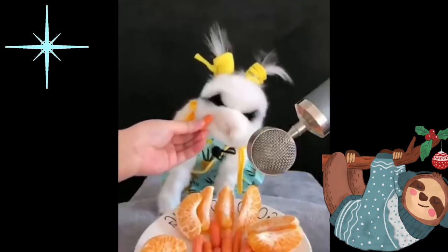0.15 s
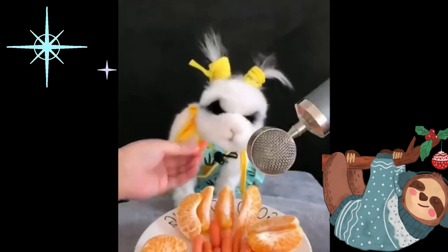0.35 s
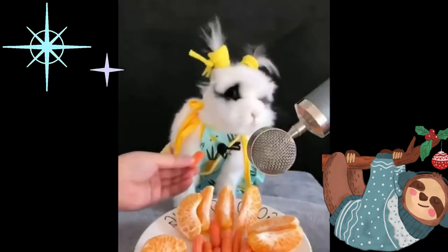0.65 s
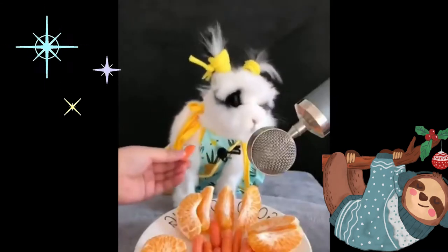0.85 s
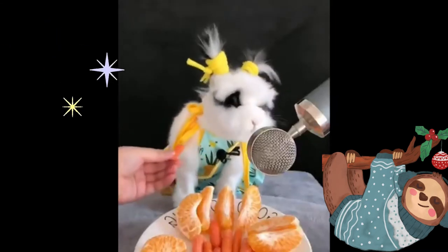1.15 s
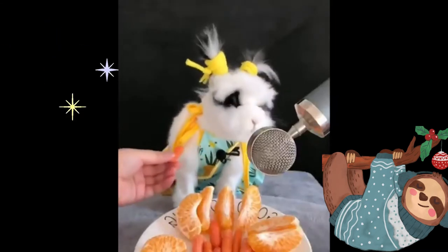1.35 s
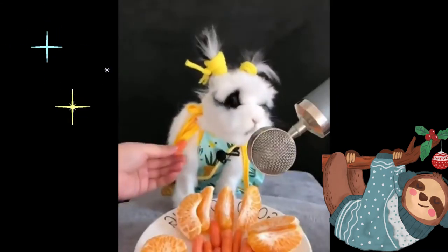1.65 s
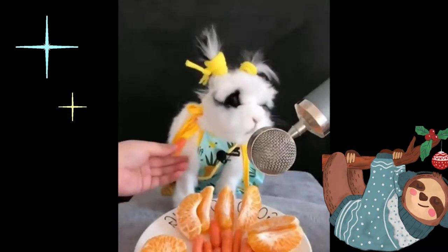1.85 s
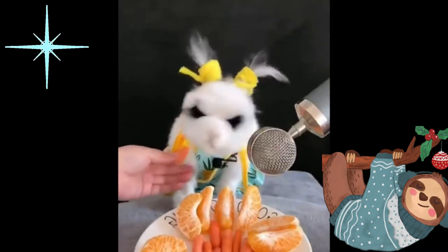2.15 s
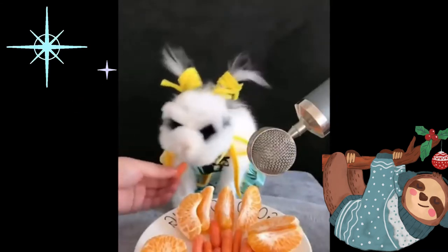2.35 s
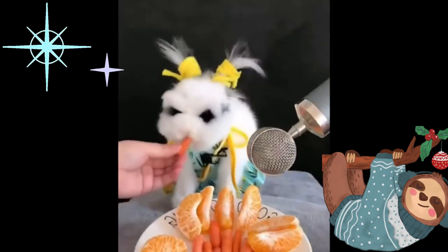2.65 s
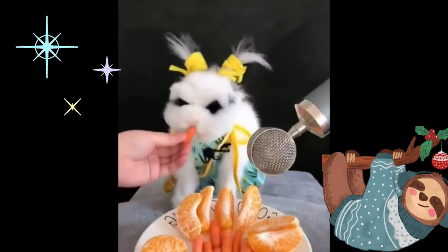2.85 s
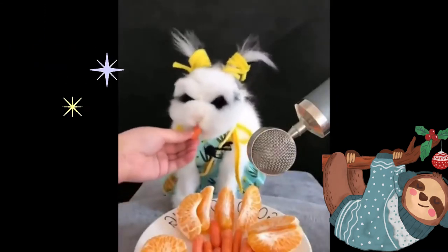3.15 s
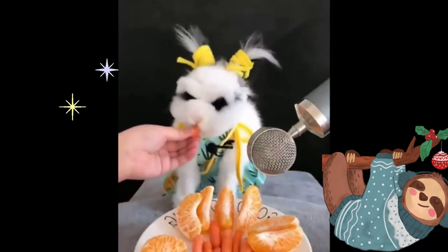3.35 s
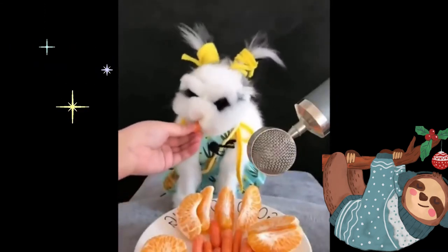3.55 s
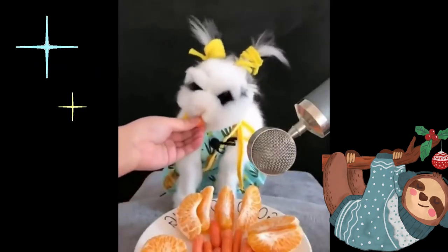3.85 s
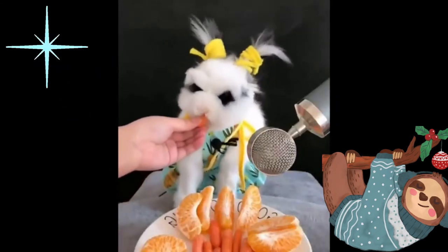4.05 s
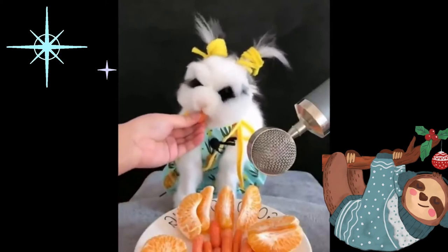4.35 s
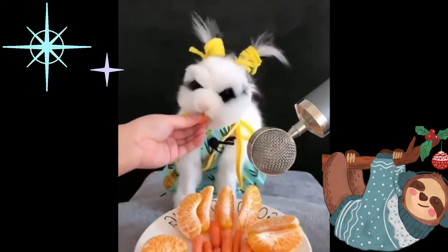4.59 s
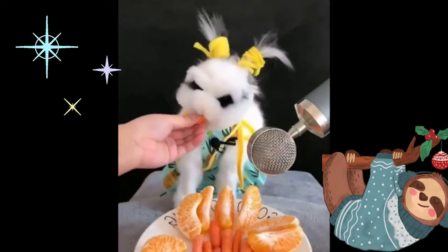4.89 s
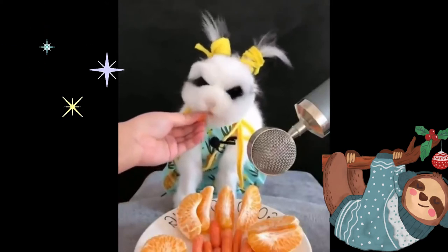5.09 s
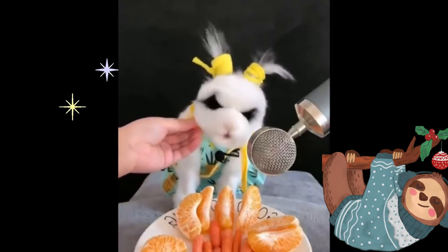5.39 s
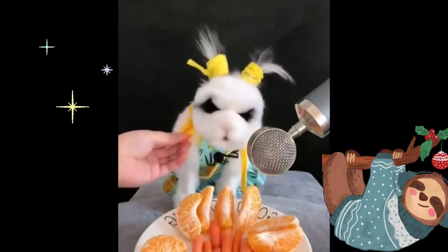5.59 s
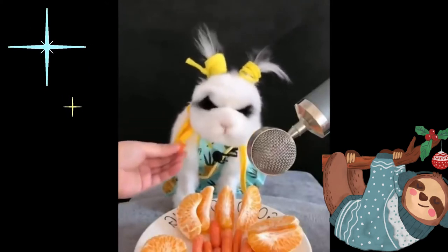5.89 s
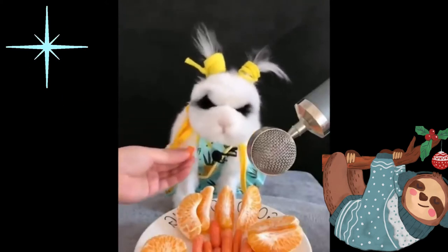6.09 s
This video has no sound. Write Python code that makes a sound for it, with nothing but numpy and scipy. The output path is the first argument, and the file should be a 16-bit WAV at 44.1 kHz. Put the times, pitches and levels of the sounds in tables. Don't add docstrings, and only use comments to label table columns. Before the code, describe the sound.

A rabbit eats carrot right beside a microphone in a quiet, dry room. About five small, moist grinding strokes a second come first, with tiny clicks and lip ticks. Halfway through it bites fresh carrot, and the crunches turn much louder, crisper and snappier, with soft low jaw thuds, before easing slightly at the end.

```python
import sys
import numpy as np
from scipy import signal
from scipy.fft import rfft, irfft, next_fast_len
from scipy.io import wavfile
from scipy.ndimage import uniform_filter1d, map_coordinates

SR = 44100
rng = np.random.default_rng(int(sys.argv[2]) if len(sys.argv) > 2 else 0)


def invert_db(x):
    u = np.asarray(x, float) / 20
    return 10 ** u


def master_out(mix):
    frames = np.transpose(np.atleast_2d(mix))
    ceiling = np.clip(frames, -1, 1)
    pcm = np.round(ceiling * 32767).astype(np.int16)
    wavfile.write(sys.argv[1], SR, pcm)


N = 274743

# frequency in Hz, density in dB per Hz.
PULP_SPECTRUM = [(1060, 7.5), (1800, 2.5), (2190, -1), (3640, -2), (6810, 1.5), (12500, -13.5),
                 (13300, -42), (14000, -55)]
# frequency in Hz, density in dB per Hz.
ROOM_SPECTRUM = [(41, -43), (70, -6), (156, -5), (327, -12.5), (850, -20), (1310, -24.5), (2000, -31),
                 (2600, -36), (4400, -120)]
# frequency in Hz, density in dB per Hz.
STAND_SPECTRUM = [(1.8, -11), (3.0, 5.5), (20, -1.5), (40, -7.5), (108, -26.5), (150, -37.5), (200, -41.5),
                  (330, -120)]
# frequency in Hz, density in dB per Hz.
TEETH_SPECTRUM = [(1060, -9), (1800, -3), (2120, -5), (3550, -4), (6750, -10), (7480, -7.5), (11000, -24.5),
                  (12300, -61), (13100, -43), (14000, -55)]
# time in seconds, rustle in dB, resonance of the lip gap in Hz.
MOUTHFUL = [(0.0, -59, 6100), (0.7, -64.5, 6100), (1.1, -69, 6600), (1.85, -66.5, 6050), (2.0, -62, 6400),
            (2.25, -67, 7000), (2.55, -65, 5600), (3.0, -68.5, 6150), (3.55, -60, 7000),
            (3.85, -59.5, 6000), (4.1, -60.5, 6460), (4.5, -65.5, 6200), (4.7, -50.5, 7640),
            (4.95, -61, 6450), (5.2, -74, 6300), (5.4, -58, 6600), (5.75, -66, 6200), (6.23, -59.5, 6600)]
# time in seconds, resonance in Hz.
CAVITY = [(0.03, 820), (0.14, 650), (0.2, 1030), (0.37, 770), (1.82, 867), (2.04, 1190), (2.27, 800),
          (2.53, 785), (2.71, 1410), (2.89, 940), (3.33, 1370), (3.51, 1010), (3.98, 1220), (4.16, 1440),
          (4.89, 1170), (5.69, 1440), (5.87, 900), (6.05, 1380)]
# start in seconds, length in seconds, early level in dB,
# late level in dB, mouth ring relative to the crackle in dB.
GRINDS = [(0.02, 0.039, -51, -46.5, 2), (0.14, 0.04, -45, -60.5, 9.5), (0.205, 0.064, -41.5, -51.5, -3),
          (0.37, 0.049, -46, -49.5, 1.5), (0.573, 0.052, -48, -49, -2.5), (0.756, 0.096, -54, -53.5, -2),
          (0.958, 0.08, -55, -47.5, 1.5), (1.209, 0.084, -47.5, -44, -4), (1.407, 0.054, -50.5, -42.5, -5),
          (1.611, 0.063, -52, -47.5, -3), (1.814, 0.042, -51, -42.5, -5), (2.04, 0.083, -47.5, -50, -9),
          (2.268, 0.074, -49, -48.5, 0.5), (2.524, 0.09, -43.5, -62.5, -1.5),
          (2.711, 0.078, -49.5, -50.5, -6), (2.892, 0.066, -54, -47.5, 1.5),
          (3.103, 0.068, -56.5, -49.5, -1.5)]
# start in seconds, length in seconds, early level in dB,
# late level in dB, mouth ring relative to the crackle in dB.
BITES = [(3.325, 0.063, -36, -39.5, -8.5), (3.515, 0.052, -38.5, -36.5, -5),
         (3.75, 0.048, -35, -30.5, -7.5), (3.98, 0.011, -39, -39, -7), (4.014, 0.03, -36, -43.5, -7.5),
         (4.157, 0.051, -36, -39, -5.5), (4.244, 0.041, -33.5, -34, -12.5),
         (4.449, 0.072, -40.5, -41.5, -6.5), (4.677, 0.076, -38.5, -41.5, -6), (4.895, 0.038, -35, -33, -4),
         (5.119, 0.06, -48, -67, -30), (5.167, 0.03, -36.5, -41.5, -16), (5.195, 0.066, -39, -44.5, -6.5),
         (5.444, 0.093, -45.5, -45.5, -10), (5.6, 0.018, -42.5, -46.5, -5), (5.652, 0.021, -40, -41, -8),
         (5.688, 0.067, -39.5, -37.5, -9), (5.868, 0.072, -45.5, -49, -5), (6.051, 0.095, -47.5, -41, -5.5)]
# start in seconds, level in dB,
# mouth ring relative to the crackle in dB.
TONGUE_SLIPS = [(0.317, -59.5, 4), (0.497, -77, -2), (2.166, -57.5, 4), (2.383, -62.5, 10.5),
                (2.629, -66, 11.5), (2.844, -64.5, 14), (2.993, -62, 5.5), (3.216, -56.5, 3),
                (3.439, -54, -3), (3.623, -61, -22), (3.858, -63, -22), (4.105, -51.5, -20),
                (4.395, -58, -19), (4.605, -55, 0.5), (4.8, -62, 2), (4.985, -55, -13), (3.24, -59.5, -16),
                (5.322, -52.5, -2), (5.8, -63, -8), (6.215, -56.5, 3.5)]
# time in seconds, peak in dB.
KNOCKS = [(0.1396, -59), (0.2, -47), (0.2131, -25.5), (0.4081, -39), (0.5012, -44.5), (0.569, -41),
          (0.8004, -44), (1.2134, -36.5), (1.237, -58), (1.4406, -42), (1.8416, -40), (2.0062, -42.5),
          (2.068, -40), (2.1651, -43), (2.2892, -36.5), (2.3163, -36), (2.5477, -37), (2.5521, -53),
          (2.7164, -37), (2.742, -37), (2.916, -38.5), (2.9195, -39), (3.1338, -36), (3.2901, -40.5),
          (3.4647, -36.5), (3.471, -37.5)]
# time in seconds, peak in dB.
CRUNCHES = [(3.5255, -33), (3.538, -27.5), (3.5422, -27.5), (3.6268, -40.5), (3.75, -30.5), (3.8708, -42.5),
            (3.9895, -26), (4.2026, -36.5), (4.2613, -21), (4.2898, -23), (4.3621, -40), (4.7055, -22),
            (4.7137, -27.5), (4.9161, -23), (4.9295, -19.5), (4.9341, -21.5), (4.938, -24.5), (5.2199, -35),
            (5.6214, -28.5), (5.704, -21), (5.731, -47), (5.8458, -42.5), (6.0255, -32.5), (6.0902, -30.5),
            (6.1999, -33.5)]
# time in seconds, peak in dB.
SNAPS = [(3.3194, -37), (3.382, -30), (3.3857, -31.5), (3.548, -29), (3.56, -17.5), (3.572, -11.5),
         (3.7457, -34), (3.786, -20), (4.155, -37), (4.2451, -30), (4.2492, -19), (4.2677, -15.5),
         (4.4722, -32), (4.789, -31.5), (4.9424, -22.5), (5.1258, -34), (5.147, -46), (5.158, -51),
         (5.3785, -41), (5.477, -42), (5.542, -52), (5.587, -48), (5.868, -47), (6.1089, -66), (6.12, -53)]
# time in seconds, peak in dB.
SPITS = [(0.4323, -38), (0.439, -39), (0.496, -50), (0.6095, -50), (0.7128, -36.5), (0.9374, -39.5),
         (1.279, -49), (1.3749, -40.5), (1.5575, -42), (1.9604, -50), (2.0297, -52), (2.6633, -48.5),
         (2.818, -64), (3.2653, -41.5), (3.921, -85), (4.8575, -33.5), (4.8645, -44), (4.8841, -64),
         (5.911, -51), (6.003, -52)]
# time in seconds, peak in dB.
POPS = [(0.148, -39), (0.9876, -35), (1.8246, -49), (3.304, -42), (3.5164, -34.5), (3.9803, -42),
        (4.676, -49), (4.8508, -43.5), (4.9798, -45), (5.66, -42), (5.8825, -38.5), (5.921, -48.5),
        (6.063, -43)]
# time in seconds, peak in dB, frequency in Hz.
THUDS = [(0.14, -31, 199), (1.206, -51, 80.7), (1.362, -37, 80.7), (1.754, -44, 104), (2.027, -39, 121),
         (2.282, -41, 91.5), (2.855, -38, 80.7), (3.107, -56, 98), (3.229, -34, 124), (3.318, -27, 140),
         (3.507, -29, 83), (3.741, -28.5, 93), (3.973, -26, 92), (4.153, -29, 82), (4.253, -32, 177),
         (4.458, -33.5, 80.7), (4.667, -29.5, 137), (4.843, -27.5, 89), (4.895, -24.5, 80),
         (5.698, -41.5, 101)]


def unit(x):
    return x / np.sqrt(np.mean(x ** 2) + 1e-20)


def along(points, hz):
    fade_in = (points[0][0] / 3, points[0][1] - 40)
    f, db = np.transpose([fade_in] + list(points))
    return np.interp(np.log(hz + 1), np.log(f + 1), db, left=-120, right=-120)


def wobble(rate, n):
    knots = rng.standard_normal(int(n * rate / SR) + 4)
    return map_coordinates(knots, [np.arange(n) * rate / SR])


def filtered(x, response):
    m = next_fast_len(len(x) + 4096)
    return irfft(rfft(x, m) * response(np.fft.rfftfreq(m, 1 / SR)), m)[:len(x)]


def resonance(hz, width_hz):
    return lambda f: 1j * f * width_hz / (hz * hz - f * f + 1j * f * width_hz)


def coloured(x, points):
    return unit(filtered(x, lambda f: invert_db(along(points, f))))


def add(track, s, x):
    part = track[round(s * SR):][:len(x)]
    part += x[:len(part)]


def bursting(n, rate, spread_db, hiss):
    when = rng.random(n) < rate / SR
    size = np.minimum(rng.exponential(size=n), 4.5)
    sign = np.sign(rng.standard_normal(n))
    return unit(when * invert_db(spread_db * size) * sign) + hiss * rng.standard_normal(n)


def patchy(x, patch_db, lip_db):
    hz, t, z = signal.stft(x, SR, nperseg=256)
    field = rng.standard_normal(z.shape)
    field = uniform_filter1d(uniform_filter1d(field, 6, 0), 7, 1)
    lip_hz = np.interp(t, *np.transpose(MOUTHFUL)[::2])
    octaves_off = np.log(hz[:, None] / lip_hz + 1e-3) / 0.14
    gain = invert_db(patch_db * unit(field) + lip_db / (1 + octaves_off ** 2))
    weight = np.mean(np.abs(z) ** 2, axis=1, keepdims=True)
    gain = gain / np.sum(gain ** 2 * weight, axis=0) ** .35
    return unit(signal.istft(z * gain, SR, nperseg=256)[1][:N])


def cavity(s):
    return np.interp(s, *np.transpose(CAVITY))


def jaw():
    lead_s, jolt_s = 0.011, 0.072
    duck_from_db, duck_ratio, recover_s = -41.5, 1.2, 0.049
    t = np.arange(0, N, 64) / SR
    s, length, early_db, late_db, _ = np.transpose(GRINDS + BITES)[..., None]
    stroke_db = (early_db + late_db) / 2
    force_db = 5.5 + 0.1 * (stroke_db + 46)
    jolt = (force_db * np.exp(-((t - s + lead_s) / jolt_s) ** 2)).max(axis=0)
    after = (t - s - length).clip(0) / recover_s
    over_db = (stroke_db - duck_from_db).clip(0)
    duck_db = -duck_ratio * (over_db * np.e * after * np.exp(-after)).sum(axis=0)
    return [np.interp(np.arange(N) / SR, t, curve) for curve in (jolt, duck_db)]


def background():
    jolt, duck_db = jaw()
    pulp_db = np.interp(np.arange(N) / SR, *np.transpose(MOUTHFUL)[:2]) + 0.32 * duck_db
    room_db = -64 + 1.2 * jolt + 0.64 * duck_db
    stand_db = -38.5 + jolt + duck_db
    shifting = wobble(25, N)

    drops = bursting(N, rate=900, spread_db=3.2, hiss=1.2)
    rustle = patchy(coloured(drops, PULP_SPECTRUM), patch_db=4, lip_db=5.5)
    rustle = invert_db(pulp_db + 2.0 * shifting) * rustle

    stir_db = 2.2 * shifting + 1.5 * wobble(30, N)
    room = invert_db(room_db + stir_db) * coloured(rng.standard_normal(N), ROOM_SPECTRUM)
    stand = invert_db(stand_db) * coloured(rng.standard_normal(N), STAND_SPECTRUM)

    air = patchy(rng.standard_normal(N), patch_db=4, lip_db=0)
    hiss_db = -66 + 0.52 * (room_db + 56) + 3 * wobble(11, N)
    hiss = invert_db(hiss_db) * filtered(air, lambda f: 1 / (1 + (f / 11500) ** 4))

    band = resonance(5300, 500)
    whine_db = -76 + duck_db + 4.2 * wobble(6.05, N)
    whine = invert_db(whine_db) * unit(filtered(air, lambda f: band(f) ** 2))
    return rustle + room + stand + hiss + whine


def strokes():
    slip_s, closed = 0.031, 0.67
    slips = [(s, slip_s, db, db, mouth_db, closed * cavity(s)) for s, db, mouth_db in TONGUE_SLIPS]
    return [(*row, cavity(row[0])) for row in GRINDS + BITES] + slips


def mouth_ring(bursts, cavity_hz):
    ring = resonance(cavity_hz, 0.22 * cavity_hz)
    low = resonance(0.78 * cavity_hz, 1.67 * cavity_hz)
    return filtered(bursts, lambda f: ring(f) * (ring(f) + invert_db(10.5) * low(f)) + invert_db(10.0) * low(f) ** 2)


def chews():
    out = np.zeros(N)
    cells = bursting(N, rate=1100, spread_db=2.5, hiss=0.85)
    crackle = patchy(coloured(cells, TEETH_SPECTRUM), patch_db=2.4, lip_db=7)
    spray = unit(filtered(cells, resonance(11700, 6200)))
    dip = resonance(2170, 2900)
    for s, length, early_db, late_db, mouth_db, cavity_hz in strokes():
        start = max(round((s - .02) * SR), 0)
        t = np.arange(min(int(.19 * SR), N - start)) / SR - .02
        now = slice(start, start + len(t))

        press_db = np.interp(t / length, [.25, .75], [early_db, late_db])
        spray_db = 4.3 * (press_db + 34.0) - 14.5
        closing_db = 7 * np.exp(-t / .005)
        release_db = 6 * np.exp(np.minimum((t - length) / .014, 3))
        press_db -= closing_db + release_db
        steps_db = 3.1 * wobble(110, len(t))

        mouth = mouth_ring(cells[now], cavity_hz)
        mouth = mouth / np.std(mouth[(t > 0) & (t < length)])
        deep = invert_db(mouth_db + 4.1 * wobble(81, len(t))) * mouth

        depth = np.clip(1.23 * np.log(cavity_hz / 750), -.6, .9)
        bright = filtered(crackle[now], lambda f: 1 - depth * dip(f))
        bright = bright + invert_db(spray_db) * spray[now]
        add(out, start / SR, invert_db(press_db + steps_db) * (bright + deep))
    return out


def sags():
    sag_s, lead_s = 0.016, 0.0031
    out, t = np.zeros(N), np.arange(-.04, .04, 1 / SR)
    for s, *_ in (GRINDS + BITES)[1:]:
        pull = invert_db(-37 + 1.6 * rng.standard_normal())
        add(out, s - lead_s + t[0], -pull * np.exp(-(t / sag_s) ** 2))
    return out - out.mean()


def fractures(table, knock_db, centre_hz, spit_db):
    out, t = np.zeros(N), np.arange(int(0.03 * SR)) / SR
    body = invert_db(min(knock_db, 2) - 10)
    flesh, wide, high = resonance(3400, 2500), resonance(3600, 21000), resonance(11000, 4500)
    for s, db in table:
        hz = centre_hz * np.exp(0.06 * rng.standard_normal())
        band = resonance(hz, 0.6 * hz)
        decay = invert_db(-60 * t / 0.0014) + invert_db(-24 - 60 * t / 0.045)
        shock = rng.standard_normal(len(t)) * decay

        def fibre(f):
            bright = band(f) ** 2 / (1 + 1j * (f / 9500) ** 3)
            return bright + body * (flesh(f) ** 2 + 0.46 * wide(f))

        snap = filtered(shock, fibre)
        spit = rng.standard_normal(len(t)) * invert_db(-60 * t / 0.04 + spit_db)
        snap = snap / np.abs(snap).max() + filtered(spit, lambda f: high(f) ** 2)
        knock = np.sin(2 * np.pi * 1.087 * cavity(s) * t) * invert_db(knock_db - 60 * t / 0.0031)
        add(out, s - .0003, invert_db(db + 6.0) * (snap - knock))
    return out


def cracks():
    molars = fractures(KNOCKS, knock_db=1, centre_hz=5640, spit_db=-40)
    fresh = fractures(CRUNCHES, knock_db=-0.5, centre_hz=6300, spit_db=-50)
    front = fractures(SNAPS, knock_db=-14, centre_hz=6470, spit_db=-45)
    lips = fractures(SPITS, knock_db=-28, centre_hz=7950, spit_db=-13.5)
    deep = fractures(POPS, knock_db=8.6, centre_hz=5300, spit_db=-40)
    return molars + fresh + front + lips + deep


def thuds():
    lag_s = 0.00798
    out, t = np.zeros(N), np.arange(int(.05 * SR)) / SR
    for s, db, hz in THUDS:
        envelope = invert_db(db + 11 - 58 * t * hz) * (1 - np.exp(-t / 0.00067))
        add(out, s + lag_s, -envelope * np.sin(2 * np.pi * hz * t))
    return out


def squeak():
    start_s, level_db, hz, length_s = 5.966, -53, 3780, .018
    out, t = np.zeros(N), np.arange(int(.05 * SR)) / SR
    waver = 1.4 * wobble(300, len(t))
    swell = np.sin(np.pi * np.minimum(t / length_s, 1)) ** 2
    add(out, start_s, invert_db(level_db) * np.sin(2 * np.pi * hz * t + waver) * swell)
    return out


def scene():
    return (background() + chews() + sags() + cracks() + thuds() + squeak())[None]


def top_cut(x):
    return signal.sosfilt(signal.butter(12, 14310, fs=SR, output="sos"), x)


def record(dry):
    top_hz, offset = 13130, -.0044
    corners = [top_hz - 150, top_hz + 150, top_hz + 1400]
    limited = filtered(dry[0], lambda f: invert_db(np.interp(f, corners, [0, -16, -45])))
    return top_cut(limited[None] + offset)


dry = scene()
out = record(dry)
master_out(out)
```